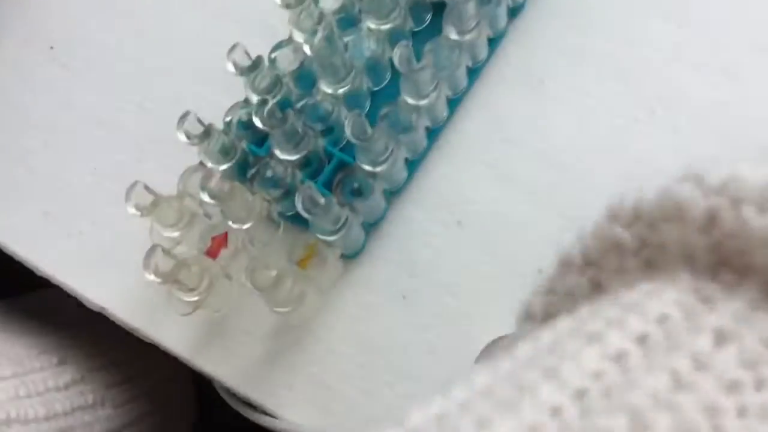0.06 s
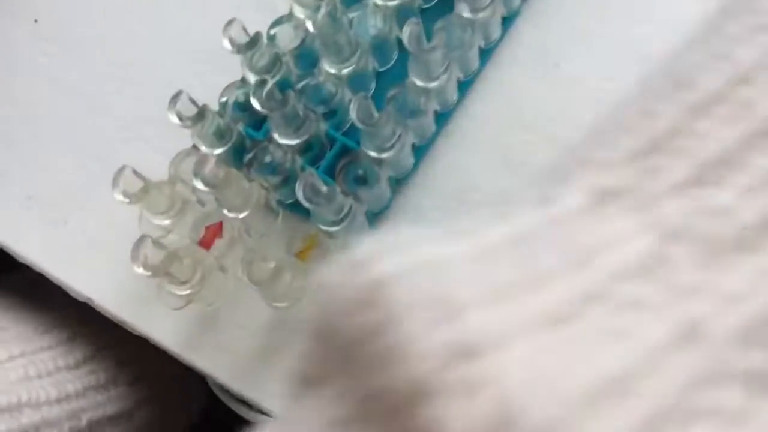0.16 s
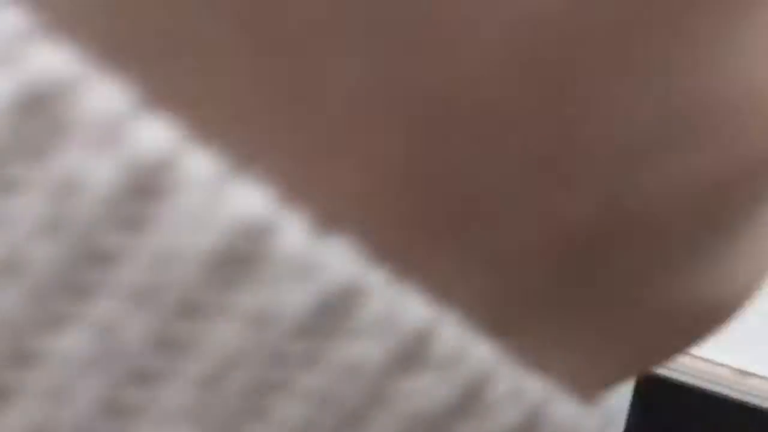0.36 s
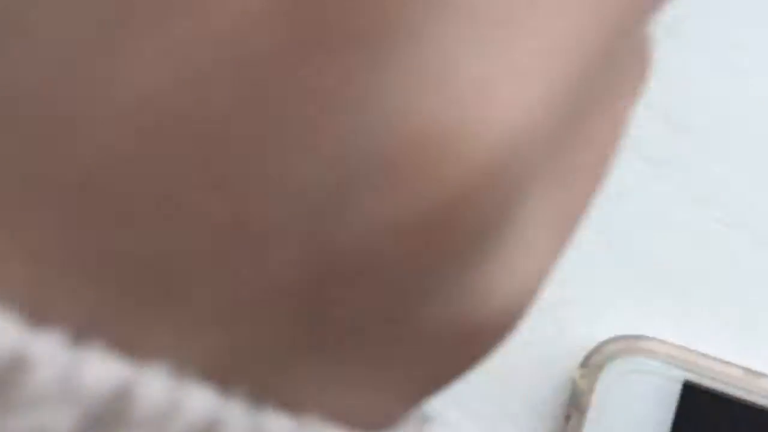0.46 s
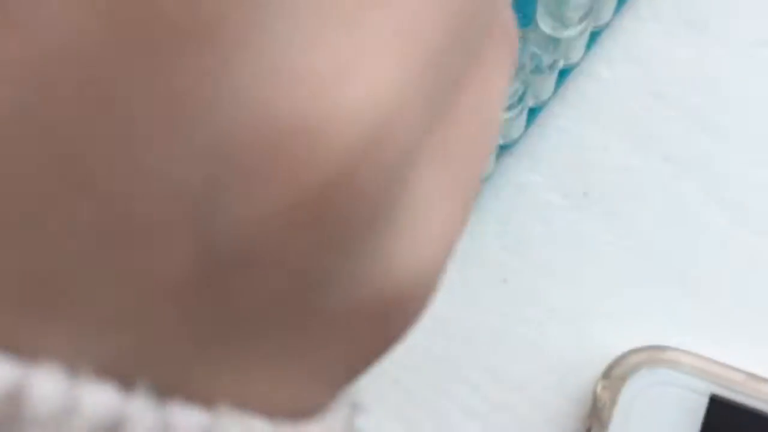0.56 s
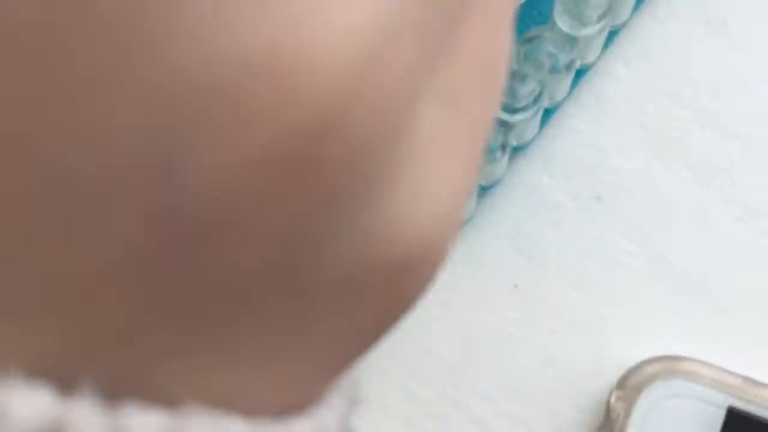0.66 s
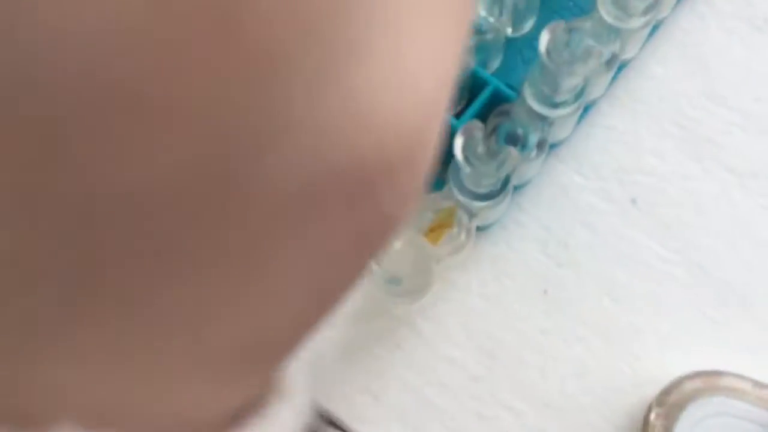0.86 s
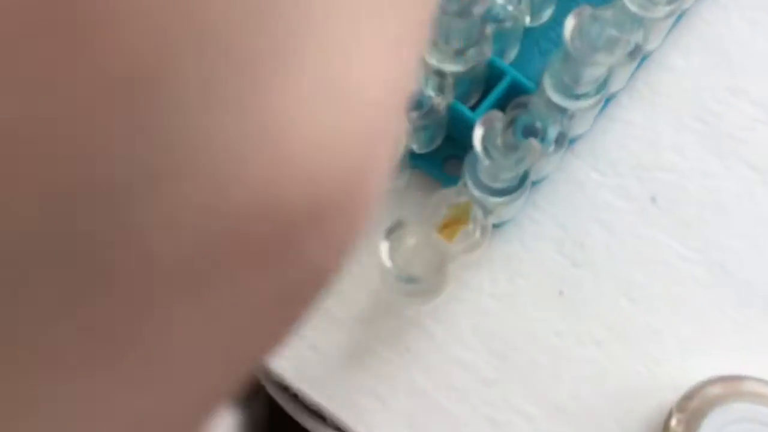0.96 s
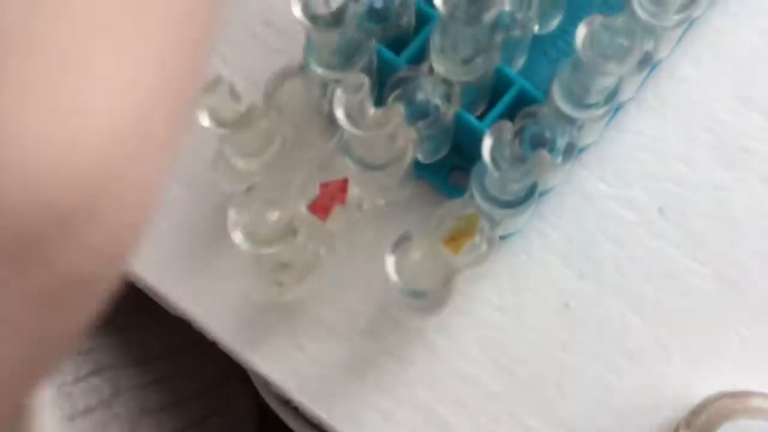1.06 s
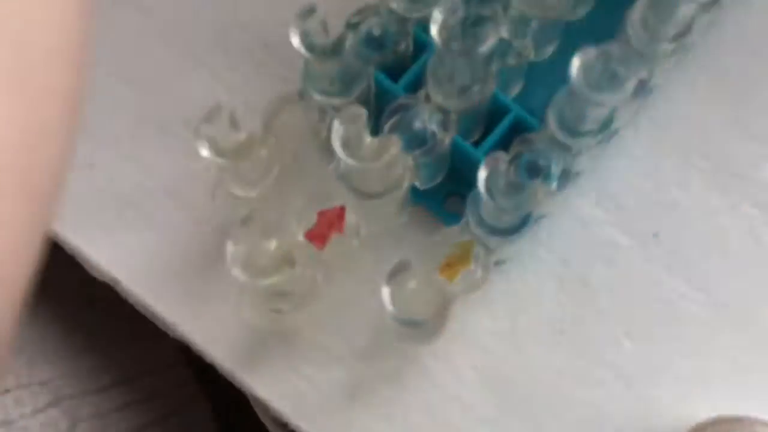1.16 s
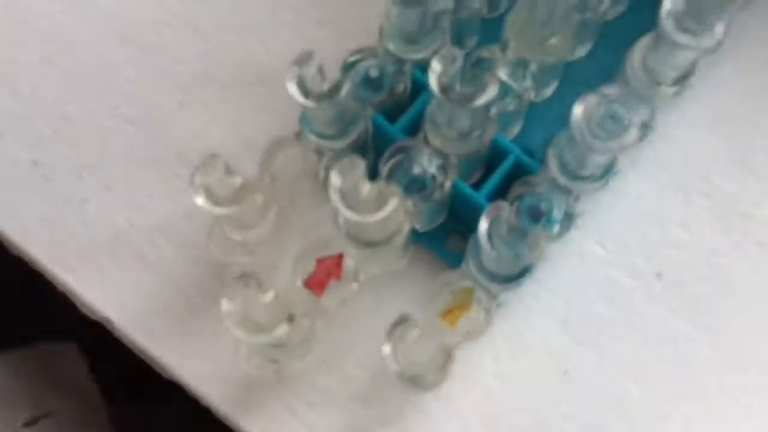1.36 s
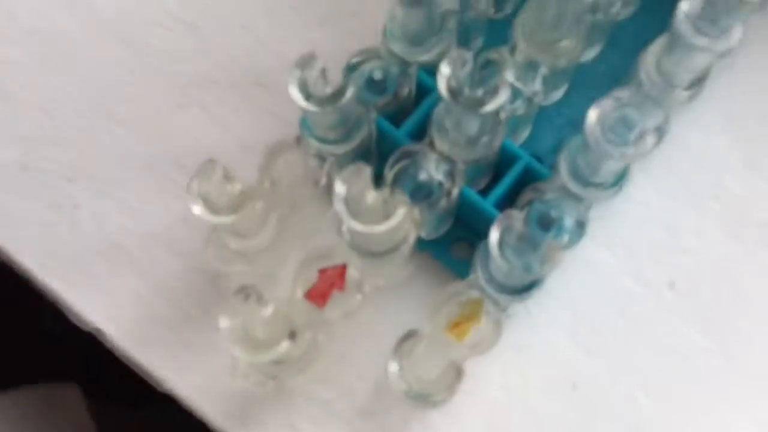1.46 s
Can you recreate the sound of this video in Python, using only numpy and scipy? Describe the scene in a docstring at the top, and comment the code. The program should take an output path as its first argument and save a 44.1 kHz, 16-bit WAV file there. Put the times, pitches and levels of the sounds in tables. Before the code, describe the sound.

After a brief quiet, hard hollow plastic clatters sharply on a tabletop and rocks ever faster to rest; a light fingernail tick, dull fingertip bumps and barely audible sleeve rustle follow, close-miked in a small room.

```python
"""A small room, microphone close to a tabletop: a plastic bracelet loom is set down, knocks, clatters from edge
to edge and rocks to rest ever faster. Each contact rings damped modes of plate, edges, pegs and tabletop,
with bursts of coloured noise for its crack. Then the hand leaves: nail ticks, soft fingertip bumps,
skin sliding and a faint sleeve rustle made of swelling noise. Low noise rumbles under a faint steady hum."""
import sys
import numpy as np
from scipy import signal
from scipy.fft import rfft, irfft
from scipy.io import wavfile

SR = 44100
rng = np.random.default_rng(int(sys.argv[2]) if len(sys.argv) > 2 else 0)


def master(y):
    """Save y as 16-bit WAV."""
    cut = np.clip(np.atleast_2d(y).T, -1, 1)
    pcm = np.round(cut * 32767)  # scale
    wavfile.write(sys.argv[1], SR, pcm.astype(np.int16))


N = 66150

# room rumble, spectrum: f/Hz, level/dB
RUMBLE_COLOUR = [(18, -44), (32, -24), (48, -3), (75, -2.5), (115, -3), (175, -3.5), (260, -13.5),
                 (370, -10), (500, -23.5), (750, -21.5), (1100, -27.5), (1800, -29.5), (3500, -32),
                 (6000, -35.5), (16000, -37.5)]
RUMBLE_DB, HUM_DB, HUM_HZ = -65, -71.5, 119

# loom contacts: t/s, knock level before its low-pass/dB, knock low-pass f/Hz, edge tick level/dB, peg level/dB
LOOM_CONTACTS = [(0.2076, -4, 4950, -32, -36), (0.2151, -22.5, 5000, -8, -28.5),
                 (0.218, 2.5, 5540, -16.5, -28), (0.2470, -13, 4200, -23.5, -33),
                 (0.2577, -5, 3380, -11, -9.5), (0.2839, -10.5, 1900, -15, -19),
                 (0.3062, -14, 2180, -18.5, -38), (0.3218, -3, 5170, -20, -29),
                 (0.3252, -14, 4260, -10, -23.5), (0.3553, -8, 2970, -23, -32.5),
                 (0.3747, -26, 2000, -16.5, -36), (0.3782, -13, 1700, -19, -34)]
KNOCK_LAG_S = 0.00024  # the plate answers just after the edge touches
# final rocking: each gap is a fixed share of the one before, each blow weaker by a fixed step
ROCK_START_S, ROCK_FIRST_GAP_S, ROCK_GAP_SHRINK = .3970, .0157, .853
ROCK_KNOCK_DB, ROCK_BRIGHT_HZ, ROCK_TICK_DB, ROCK_PEG_DB = -18, 1590, -23.5, -42
ROCK_KNOCK_STEP_DB, ROCK_TICK_PEG_STEP_DB = -1.85, -2.65

# modes of the base plate on the table: f/Hz, t60/s, relative level/dB
PLATE_MODES = [(400, 0.11, -22), (616, 0.12, -20), (784, 0.042, -20), (1034, .06, -9.5),
               (1139.6, 0.041, -3), (1268, .04, -12), (1480, .04, 1.5), (1480, 0.017, -14),
               (2061, 0.028, -7), (2475, .03, -5), (2760, .08, -11.5), (2893, 0.1, -10), (3358, .028, 0.5),
               (3787, .022, -8.5)]
# modes of the stiff edges and ribs: f/Hz, t60/s, relative level/dB
EDGE_MODES = [(5054, .02, -8), (5690, .018, -1.5), (6950, .02, -5.5), (7550, 0.0051, -6), (8540, .015, -2),
              (8940, 0.013, -2.5), (10780, 0.033, -7), (10850, 0.008, -5), (12670, 0.045, -8),
              (14130, 0.0033, -7), (14300, .012, -8)]
# modes of the loose pegs: f/Hz, t60/s, relative level/dB
PEG_MODES = [(6570, .035, 0), (8640, .028, -8), (2720, .06, -12)]
# modes of the tabletop: f/Hz, t60/s, relative level/dB
TABLETOP_MODES = [(91, .12, -9.5), (116.5, 0.13, 1), (169.5, .45, -4), (184.5, 0.36, -7.5)]
TABLETOP_DB, TABLETOP_RISE_T60_S = -15, .05
STRIKE_SCATTER_DB, DETUNE = 3.0, .003  # spread of mode levels, and of frequencies as a share

# spectrum of a knock's crack: f/Hz, level/dB
KNOCK_SPECTRUM = [(40, -40.5), (110, -17), (270, -21), (400, -8), (780, -4), (880, -10), (1080, 6.5),
                  (1290, 0), (1480, 8.5), (1720, -3.5), (2000, 1.5), (2850, -2), (3300, 3), (3950, -2),
                  (4600, -20), (8000, -23.5), (16000, -40)]
# spectrum of an edge tick's crack: f/Hz, level/dB
TICK_SPECTRUM = [(60, -42.5), (500, -6), (2000, -7), (4000, -4), (6200, -12), (7600, -3.5), (8600, 1),
                 (9500, -1), (10100, -5.5), (11300, 4.5), (14500, 1), (16000, -3)]
KNOCK_CRACK_DB, KNOCK_CRACK_T60_S, KNOCK_RISE_T60_S = 3, 0.014, .003
TICK_CRACK_DB, TICK_CRACK_T60_S = 2, .007
SLAP_DB = -1  # the first push of air from the plate, coloured like the knock
SNAP_DB = 1.5  # the first instant of a tick, coloured like its crack

# spectrum of the room's tail: f/Hz, level/dB
ROOM_SPECTRUM = [(50, -12.5), (150, 1), (400, -0.5), (1100, -2.5), (1500, -2.5), (2500, -2.5), (3800, -2),
                 (6500, -1), (9000, -12.5), (16000, -11)]
ROOM_DB, ROOM_T60_S, ROOM_HIGH_T60_S, ROOM_RISE_T60_S = -13.5, 0.4, .3, 0.02
EARLY_DB, EARLY_T60_S, EARLY_RISE_T60_S = -11, 0.038, .02
PEG_ROOM_DB = -8.5  # the pegs face the microphone, so less of their ring comes back from the room

# light fingernail ticks: t/s, level/dB
NAIL_TICKS = [(0.626, -42), (.838, -29), (.847, -48), (0.965, -46)]
# spectrum of a nail tick's burst: f/Hz, level/dB
NAIL_SPECTRUM = [(300, -27), (1200, 8), (2500, -8), (5200, -8), (6700, 1), (8500, 18), (11000, 0),
                 (15500, 11.5)]
# modes of fingernail on plastic: f/Hz, t60/s, relative level/dB
NAIL_RING_MODES = [(1160, 0.037, -4), (4870, 0.023, -3.5), (5497, 0.03, 4), (8030, 0.013, -6),
                   (9000, 0.02, -4), (12400, 0.0067, -12), (14700, .008, -12)]
NAIL_RING_DB = -8.5

# strokes of the knitted sleeve: middle t/s, Gaussian spread t/s, level before low-pass/dB, low-pass f/Hz
SLEEVE_STROKES = [(.705, 0.044, -68, 3180), (1.135, 0.06, -72, 6100), (1.33, 0.072, -75, 14100),
                  (1.46, 0.066, -71, 6420)]
# spectrum of the sleeve: f/Hz, level/dB
SLEEVE_SPECTRUM = [(300, -18), (1000, 0.5), (2200, -1.5), (3600, -0.5), (6000, -1.5), (8000, -5.5),
                   (16000, -11)]
RUB_GRAIN = .15  # depth of the random loudness flicker, natural-log gain

# soft fingertip bumps: t/s, level/dB
FINGER_BUMPS = [(.956, -47.5), (.963, -39.5), (.9675, -32), (.978, -35), (.990, -38.5), (1.014, -43)]
# spectrum of a bump: f/Hz, level/dB
BUMP_SPECTRUM = [(30, -15), (90, -1), (220, 5.5), (600, -9), (1500, -7.5), (2400, -22.5), (6000, -36),
                 (12000, -18), (16000, -25)]

# strokes of skin over plastic: middle t/s, Gaussian spread t/s, level before low-pass/dB, low-pass f/Hz
SKIN_STROKES = [(.966, .005, -69, 16000), (1.05, 0.025, -65, 15000)]
# spectrum of sliding skin: f/Hz, level/dB
SKIN_SPECTRUM = [(500, -33), (7500, -22), (9500, 0.5), (11800, 6), (14000, 4), (16000, -8)]

LOW_CUT_HZ, TOP_HZ = 29, 15900  # band kept by the recorder


def undb(db):
    """Decibels to gain."""
    return 10 ** (np.asarray(db) / 20)


def seconds():
    """The time of every sample."""
    return np.arange(N) / SR


def unit(x):
    """Scale a sound or response to energy 1."""
    return x / np.sqrt(np.sum(x ** 2))


def through(x, response):
    """Pass a sound through an impulse response."""
    return signal.fftconvolve(x, response)[:N]


def colour(x, points):
    """Minimum-phase filter whose gain follows (Hz, dB) points on a log frequency axis."""
    hz, db = np.array(points).T
    grid = np.maximum(np.fft.rfftfreq(8192, 1 / SR), 1)
    gain = undb(np.interp(np.log(grid), np.log(hz), db))
    # folding the cepstrum onto positive time makes the filter causal
    cepstrum = irfft(np.log(gain))
    cepstrum[1:] *= 2
    cepstrum[len(cepstrum) // 2:] = 0
    return through(x, irfft(np.exp(rfft(cepstrum))))


def fade(t60):
    """Exponential decay, 60 dB down after t60 seconds."""
    return np.exp(-np.log(1000) * seconds() / max(t60, 1e-4))


def burst(points, t60):
    """A dying burst of coloured noise, energy 1."""
    return unit(colour(rng.standard_normal(N) * fade(t60), points))


def noise(points):
    """Steady coloured noise, rms 1."""
    return unit(colour(rng.standard_normal(N), points)) * np.sqrt(N)


def ring(modes, scatter_db=0, detune=0, size=N):
    """Sum of damped modes, energy 1; scatter and detune vary each strike as its place of impact would."""
    hz, t60, db = np.array(modes).T[:, :, None]
    weight, bend = rng.standard_normal((len(modes), 2)).T[:, :, None]
    t = seconds()[:size]
    t60 = np.maximum(t60, .002)
    decay = np.exp(-np.log(1000) * t / t60)
    # dividing by sqrt(t60) evens out the energy of long and short modes
    waves = decay * np.sin(2 * np.pi * hz * (1 + detune * bend) * t) / np.sqrt(t60)
    mix = np.sum(undb(db + scatter_db * weight) * waves, axis=0)
    return unit(np.pad(mix, (0, N - size)))


def lowpass(x, hz, order=2):
    """Smooth Butterworth low-pass."""
    return signal.sosfilt(signal.butter(order, min(hz, .45 * SR), fs=SR, output="sos"), x)


def add(out, at_s, x):
    """Mix a sound in at a time."""
    i = int(np.clip(at_s * SR, 0, N - 1))
    out[i:] += x[:N - i]


def room_floor():
    """The room at rest: low coloured noise and a steady sine hum."""
    hum = np.sin(2 * np.pi * HUM_HZ * seconds())
    return undb(RUMBLE_DB) * noise(RUMBLE_COLOUR) + undb(HUM_DB) * hum


def rocking(count):
    """Contacts that come faster and weaker as the loom settles."""
    rows, at = [], ROCK_START_S
    for k in range(count):
        knock_db = ROCK_KNOCK_DB + k * ROCK_KNOCK_STEP_DB
        drop_db = k * ROCK_TICK_PEG_STEP_DB
        rows.append((at, knock_db, ROCK_BRIGHT_HZ, ROCK_TICK_DB + drop_db, ROCK_PEG_DB + drop_db))
        at += ROCK_FIRST_GAP_S * ROCK_GAP_SHRINK ** k
    return rows


def loom():
    """Each contact ticks on an edge, knocks the plate and tabletop and shakes the pegs; returns body and pegs."""
    body, pegs = np.zeros(N), np.zeros(N)
    click = signal.unit_impulse(N)
    tabletop = undb(TABLETOP_DB) * unit(ring(TABLETOP_MODES) * (1 - fade(TABLETOP_RISE_T60_S)))
    slap = undb(SLAP_DB) * unit(colour(click, KNOCK_SPECTRUM))
    snap = undb(SNAP_DB) * unit(colour(click, TICK_SPECTRUM))
    for at, knock_db, bright_hz, tick_db, peg_db in LOOM_CONTACTS + rocking(count=11):
        plate = ring(PLATE_MODES, STRIKE_SCATTER_DB / 2, DETUNE, size=6000)
        knock_crack = undb(KNOCK_CRACK_DB) * burst(KNOCK_SPECTRUM, KNOCK_CRACK_T60_S)
        knock = unit((plate + slap + knock_crack) * (1 - fade(KNOCK_RISE_T60_S))) + tabletop
        add(body, at + KNOCK_LAG_S, undb(knock_db) * lowpass(knock, bright_hz, order=3))

        edges = ring(EDGE_MODES, STRIKE_SCATTER_DB, 2 * DETUNE, size=2000)
        tick_crack = undb(TICK_CRACK_DB) * burst(TICK_SPECTRUM, TICK_CRACK_T60_S)
        add(body, at, undb(tick_db) * unit(edges + snap + tick_crack))

        peg_ring = ring(PEG_MODES, STRIKE_SCATTER_DB / 2, DETUNE, size=5000)
        add(pegs, at, undb(peg_db) * peg_ring)
    return body, pegs


def room(x):
    """Quick echoes from table and arm, then the room's tail, shorter in the treble."""
    air = rng.standard_normal(N)
    low = lowpass(air, 3000)
    tail = low * fade(ROOM_T60_S) + (air - low) * fade(ROOM_HIGH_T60_S)
    tail = colour(tail * (1 - fade(ROOM_RISE_T60_S)), ROOM_SPECTRUM)
    early = rng.standard_normal(N) * fade(EARLY_T60_S) * (1 - fade(EARLY_RISE_T60_S))
    return through(x, undb(ROOM_DB) * unit(tail) + undb(EARLY_DB) * unit(early))


def nail_ticks():
    """A fingernail taps the plastic: a short noise burst and a weaker ring."""
    out = np.zeros(N)
    for at, db in NAIL_TICKS:
        tap = burst(NAIL_SPECTRUM, t60=0.015)
        tap = tap + undb(NAIL_RING_DB) * ring(NAIL_RING_MODES, size=2000)
        add(out, at, undb(db) * unit(tap))
    return out


def rubs(strokes, points):
    """Grainy friction noise that swells and fades with each stroke; every stroke has its own brightness."""
    flicker = unit(lowpass(rng.standard_normal(N), 200)) * np.sqrt(N)
    hiss = noise(points) * np.exp(RUB_GRAIN * flicker)
    out = np.zeros(N)
    for at, spread, db, bright_hz in strokes:
        swell = np.exp(-((seconds() - at) / spread) ** 2 / 2)
        out += undb(db) * swell * lowpass(hiss, bright_hz)
    return out


def sleeve():
    """The knitted sleeve moves: friction noise with a broad spectrum."""
    return rubs(SLEEVE_STROKES, SLEEVE_SPECTRUM)


def finger_bumps():
    """Fingertips bump the loom softly: short bursts of mostly low noise."""
    out = np.zeros(N)
    for at, db in FINGER_BUMPS:
        add(out, at, undb(db) * burst(BUMP_SPECTRUM, t60=0.025))
    return out


def skin_slides():
    """Skin slides over plastic: friction noise weighted to the treble."""
    return rubs(SKIN_STROKES, SKIN_SPECTRUM)


def scene():
    """Loom and hand taps sound direct and through the room; friction and floor are direct only."""
    floor = room_floor()
    body, pegs = loom()
    blows = body + nail_ticks() + finger_bumps()
    echoes = room(blows + undb(PEG_ROOM_DB) * pegs)
    friction = sleeve() + skin_slides()
    return (blows + pegs + echoes + friction + floor)[None]


def record(dry):
    """The recorder cuts the deepest bass and the top."""
    thin = signal.sosfilt(signal.butter(4, LOW_CUT_HZ, "high", fs=SR, output="sos"), dry)
    return signal.sosfilt(signal.ellip(10, .2, 70, TOP_HZ, fs=SR, output="sos"), thin)


dry = scene()
out = record(dry)
master(out)
```